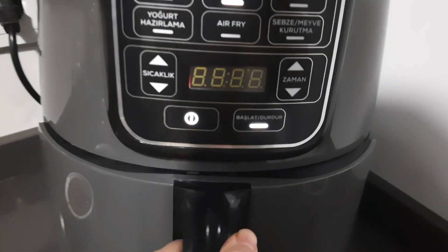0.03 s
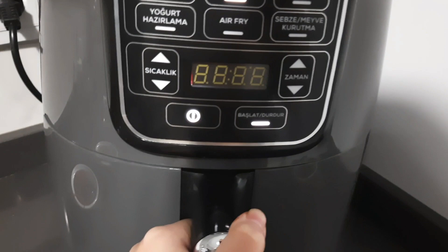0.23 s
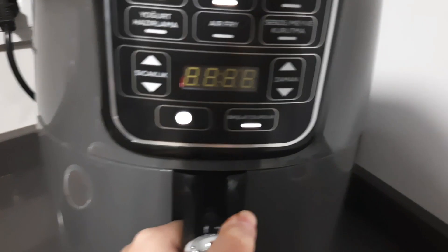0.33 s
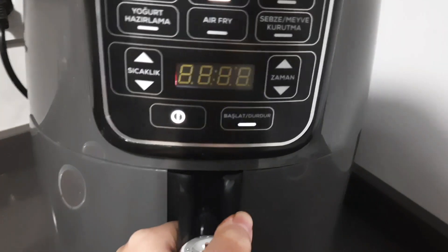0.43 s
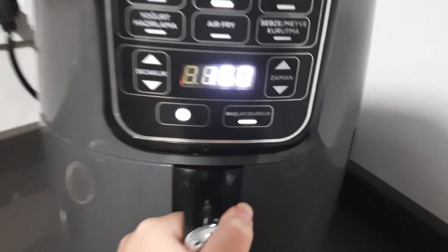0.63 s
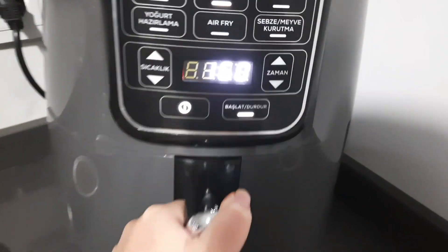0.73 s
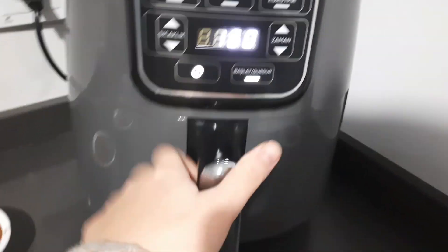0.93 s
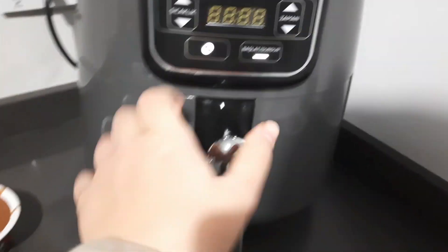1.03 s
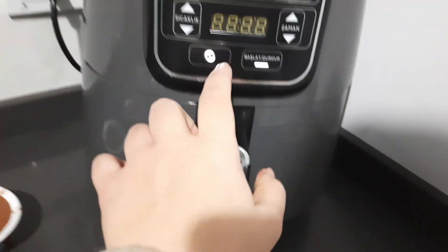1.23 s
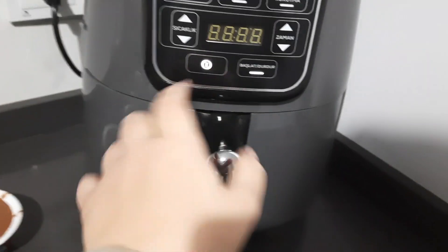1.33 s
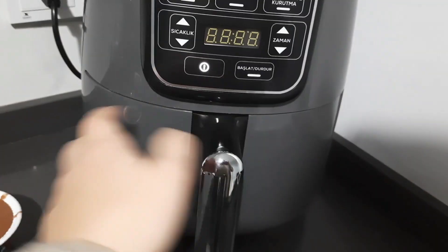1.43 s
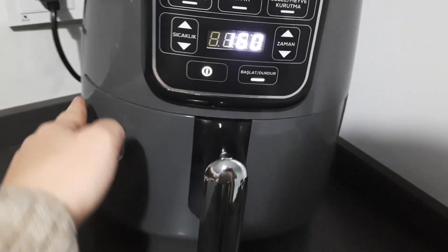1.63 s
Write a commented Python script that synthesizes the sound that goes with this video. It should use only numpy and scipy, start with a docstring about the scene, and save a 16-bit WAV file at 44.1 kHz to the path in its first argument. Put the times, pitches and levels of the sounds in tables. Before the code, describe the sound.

Close by in a small, hard-walled room, an air fryer's drawer scrapes in, bumps the hollow plastic housing and shuts with a sharp snap and a loud clunk. A light metallic rattle follows, leaving a faint electrical hum.

```python
"""A short scrape, a few bumps, a snap and a loud clunk: an air fryer's drawer is pushed shut close by.
The drawer scrapes along its runners, bumps into the hollow housing, snaps past the catch and hits the
end stop. The loose basket rattles briefly, the small hard-walled room rings on,
and a faint mains hum remains."""
import sys
import numpy as np
from scipy import signal
from scipy.fft import rfft, irfft
from scipy.io import wavfile

SR = 44100
rng = np.random.default_rng(int(sys.argv[2]) if len(sys.argv) > 2 else 0)


def digitize_waveform(pressure):
    """Quantize a signal to 16-bit integers and store it at the path in sys.argv[1].

    Rows of a 2-D input are taken as channels; values are limited to [-1, 1].
    """
    field = np.atleast_2d(pressure).T
    bounded = np.clip(field, -1, 1)
    quanta = np.round(bounded * 32767).astype(np.int16)
    wavfile.write(sys.argv[1], SR, quanta)


N = 74970  # 1.7 s


def amp(db):
    """Turns decibels into a factor to multiply a sound by."""
    return 10 ** (np.asarray(db) / 20)


def unit(x):
    """Scales a sound to an average (rms) strength of one."""
    return x / np.sqrt(np.mean(x ** 2) + 1e-20)


def read(points, hz):
    """Looks up a frequency in a table, blending between rows on a scale of octaves."""
    row_hz, value = np.transpose(points)
    return np.interp(np.log(hz + 1), np.log(row_hz + 1), value)


def level(points):
    """Makes a volume curve from rows of (time [s], level [dB])."""
    return amp(np.interp(np.arange(N) / SR, *np.transpose(points)))


def add(mix, start_s, sound):
    """Mixes a sound in at a given time."""
    part = mix[:, round(start_s * SR):][:, :sound.shape[-1]]
    part += sound[..., :part.shape[1]]


def colour(x, db_at):
    """Makes some frequencies stronger than others; db_at gives the relative level of each."""
    size = 4096
    log_gain = np.log(amp(db_at(abs(np.fft.fftfreq(size, 1 / SR)))) + 1e-6)
    response = np.exp(np.conj(signal.hilbert(log_gain)))  # rings after a hit, never before it
    taps = np.fft.ifft(response).real[:size // 2]
    return signal.fftconvolve(x, np.atleast_2d(taps / np.linalg.norm(taps)), axes=1)[:, :x.shape[1]]


def pair(x):
    """Blends two unrelated signals into left and right channels that are alike in the bass."""
    # How alike the two channels are: (frequency [Hz], likeness [0-1])
    likeness = [(100, 0.85), (300, 1), (550, .3), (1200, .25), (3000, 0), (16000, 0.7)]
    left, other = rfft(x)
    same = np.clip(read(likeness, np.fft.rfftfreq(x.shape[1], 1 / SR)), 0, 1)
    right = same * left + np.sqrt(1 - same ** 2) * other
    return irfft(np.array([left, right]), x.shape[1])


def burst(envelope):
    """A burst of stereo noise that follows the shape of a volume curve."""
    noise = pair(rng.choice([-1., 1.], (2, len(envelope))))
    return noise * envelope / np.linalg.norm(envelope)


def ring(tones, t):
    """Adds up dying tones. Here and below, a fade time is how long a sound takes to drop 60 dB."""
    return sum(amp(db - 60 * t / fade_s) * np.sin(2 * np.pi * hz * t) for hz, db, fade_s in tones)


def background(hum_hz=98.8, air_db=-68.5):
    """A wavering mains hum over quiet room noise."""
    # Tone of the room noise: (frequency [Hz], relative level [dB])
    air_tone = [(30, -10.5), (64, -8.5), (140, -2.5), (210, -13.5), (285, 1), (350, -13), (480, -4),
                (700, -13.5), (1000, -27.5), (2300, -26.5), (3500, -30), (6300, -29), (7300, -18.5),
                (8700, -31.5), (16000, -34)]
    # Wavering of the hum: (time [s], level [dB])
    hum_levels = [(0, -58.5), (1.0, -58), (1.22, -63), (1.33, -69), (1.45, -60.5), (1.56, -58), (1.7, -55)]
    air = colour(pair(rng.standard_normal((2, N))), lambda f: read(air_tone, f))
    hum = unit(np.sin(2 * np.pi * hum_hz * np.arange(N) / SR))
    return amp(air_db) * unit(air) + level(hum_levels) * hum


def room(x, delay_s=0.015, build_s=0.0049):
    """Echoes off the hard walls blur into a tail that builds quickly and dies sooner in the treble."""
    # How long the room rings: (frequency [Hz], fade time [s])
    fade_times = [(80, 1.27), (250, 0.7944), (600, 0.7033), (1300, .6), (2500, 0.602), (5500, .5),
                  (8000, 0.5), (12000, 0.52), (16000, 0.08)]
    # Strength of the echoes: (frequency [Hz], relative level [dB])
    echo_tone = [(60, -8), (150, -7), (350, 0.5), (700, 0), (1500, -7), (3000, -9.5), (7000, -12),
                 (10000, -17), (16000, -15)]
    hz, t, bands = signal.stft(pair(rng.standard_normal((2, SR))), SR, nperseg=256)
    fade_s = read(fade_times, hz)[:, None]
    bands *= amp(read(echo_tone, hz)[:, None] - 60 * t / fade_s)
    bands *= np.sqrt(2 * np.log(1000) / (fade_s * SR))  # a longer fade adds no energy
    tail = signal.istft(bands, SR, nperseg=256)[1][:, :SR]
    tail *= np.clip((np.arange(SR) / SR - delay_s) / build_s, 0, 1)
    return signal.fftconvolve(x, tail, axes=1)[:, :N]


def rattles(gain_db=28.5, fade_s=0.09, ring_db=20.5, ring_width_hz=250):
    """The loose basket chatters a few times as it settles, each time with a thin metallic ring."""
    # Rattles of the basket: (time [s], relative level [dB], pitch of the ring [Hz])
    hits = [(.374, -34.5, 5600), (0.422, -41.5, 5000), (0.442, -43.5, 5970), (0.454, -48, 6150),
            (0.47, -50, 6110)]
    # Tone of a rattle under its ring: (frequency [Hz], relative level [dB])
    basket_tone = [(300, -10), (1000, 8), (1700, 18), (2600, 1), (4000, -3), (7500, -11), (9500, -24),
                   (12000, -24), (16000, -32)]
    out, t = np.zeros((2, N)), np.arange(SR // 4) / SR
    for start_s, db, hz in hits:
        noise = burst(amp(-60 * t / fade_s))
        chatter = colour(noise, lambda f: read(basket_tone, f)
                         + ring_db / (1 + ((f - hz) / ring_width_hz) ** 2))
        add(out, start_s, amp(gain_db + db) * chatter)
    return out


def scrape(gain_db=-0.5, slips_per_s=9000, spread_db=2):
    """Many tiny slips of the drawer on its runners merge into a scrape."""
    # Loudness of the scrape during the push: (time [s], relative level [dB])
    push = [(0, -29.5), (.04, -38), (.085, -45), (.16, -50.5), (.19, -37.5), (.215, -28.5), (.245, -22.5),
            (.27, -30.5), (.3, -78.5)]
    # Tone of the scrape: (frequency [Hz], relative level [dB])
    runner_tone = [(40, -20.5), (75, -6), (110, 1.5), (220, -1.5), (330, -9), (460, -7.5), (680, -15.5),
                   (1150, -16), (1800, -17), (3300, -25), (5000, -29), (7700, -32.5), (10000, -52),
                   (16000, -63.5)]
    slips = rng.standard_normal((2, N)) * (rng.random(N) < slips_per_s / SR)
    slips *= amp(spread_db * np.minimum(rng.exponential(1, N), 3))  # a few slips stand out
    rubbing = colour(pair(slips), lambda f: read(runner_tone, f))
    return amp(gain_db) * level(push) * unit(rubbing)


def snaps(gain_db=6.5, crack_fade_s=0.0066, ring_db=-11, ring_fade_s=0.078):
    """Each snap of the catch is a sharp crack with a short bright ring."""
    # Snaps of the catch: (time [s], relative level [dB], left over right [dB])
    hits = [(0.2079, -18, 6.5), (.211, -21.5, 5.5), (0.2604, 0.5, 1), (.2625, -0.5, 1.5), (.268, -20, -1.5)]
    # Tone of a snap: (frequency [Hz], relative level [dB])
    catch_tone = [(200, -20.5), (900, -6), (1600, 4.5), (3200, -2.5), (4500, -0.5), (5500, -1), (7600, 4.5),
                  (9600, -14), (12000, -2.5), (16000, -11.5)]
    # How that tone leans to the left: (frequency [Hz], left over right [dB])
    lean = [(2000, 1.5), (4000, 6), (7000, 9), (9000, -5.5), (15000, -3.5)]
    cracks, t = np.zeros((2, N)), np.arange(SR // 4) / SR
    envelope = amp(-60 * t / crack_fade_s) + amp(ring_db - 60 * t / ring_fade_s)
    for start_s, db, balance_db in hits:
        add(cracks, start_s, amp([[db + balance_db / 2], [db - balance_db / 2]]) * burst(envelope))
    left = colour(cracks[:1], lambda f: read(catch_tone, f) + read(lean, f) / 2)
    right = colour(cracks[1:], lambda f: read(catch_tone, f) - read(lean, f) / 2)
    return amp(gain_db) * np.vstack([left, right])


def knocks(body_db=-4.5, shell_db=17, thump_fade_s=0.034, shell_fade_s=0.055):
    """Each knock thumps the wall it strikes, booms in the housing and clatters the panels."""
    # The drawer knocks, then the housing rocks on its feet and the hand lets go with a faint tap:
    # (time [s], boom [dB], clatter [dB], treble cutoff [Hz], thump [dB], thump pitch [Hz])
    hits = [(0.172, -29, -35, 1410, -29.5, 218), (0.1892, -18.5, -24, 1300, -19, 228),
            (0.2248, -20, -21, 1100, -16, 197), (0.2388, -8.5, -11, 1500, -13, 400.4),
            (0.243, -1.5, -6, 900, -6, 215.5), (0.2618, -10.5, 0, 3800, -6.5, 200.2),
            (0.2905, -2, 1.5, 1300, 3.5, 370), (0.3647, -2.5, -26, 71, -21, 80),
            (.911, -49.5, -46, 751, -48, 410)]
    # Low tones of the hollow housing and the air around it:
    # (pitch [Hz], relative level [dB], fade time [s])
    body_tones = [(80.8, -29, 0.88), (130.4, -16, .45), (150.3, -5, 0.31), (164.53, -24, 1.0),
                  (200.3, -6, 0.22), (239.2, -15, .58), (275.4, -16.5, 0.52), (311.7, -11.5, .47),
                  (330.6, -14.5, 0.22), (371.7, -10.5, 0.32), (442.5, -24.5, 0.67)]
    # Tones of the panels: (pitch [Hz], relative level [dB], fade time [s])
    panel_tones = [(586.5, -34.5, 0.3), (760.7, -37.5, .4), (926, -24.5, 0.038), (1212, -26.5, .12),
                   (1663, -25, 0.13), (1860, -27, 0.17), (2110, -30, 0.11), (2376, -25.5, 0.26),
                   (2999, -25.5, .09)]
    # Dense ringing of the plastic shell: (frequency [Hz], relative level [dB])
    shell_tone = [(40, -35.5), (120, -10), (400, -3), (650, -2.5), (1100, 1), (2000, -4.5), (4000, -10),
                  (8000, -8), (16000, -22)]
    booms, clatters, t = np.zeros((2, N)), np.zeros((2, N)), np.arange(2 * SR) / SR
    body = amp(body_db) * ring(body_tones, t)
    panels = ring(panel_tones, t[:SR])
    contact = 1 - np.exp(-t / 0.00058)  # this and the shell rise in about half a millisecond
    shell_envelope = (1 - np.exp(-t / 0.00049)) * amp(-60 * t / shell_fade_s)
    for start_s, boom_db, clatter_db, cutoff_hz, thump_db, thump_hz in hits:
        soften = signal.butter(2, cutoff_hz, fs=SR)  # soft knocks lose their treble
        thump = ring([(thump_hz, thump_db, thump_fade_s)], t)
        shell = amp(shell_db) * colour(burst(shell_envelope[:SR]), lambda f: read(shell_tone, f))
        add(booms, start_s, signal.lfilter(*soften, contact * thump))
        add(booms, start_s + 0.002, amp(boom_db) * signal.lfilter(*soften, contact * body))
        add(clatters, start_s, amp(clatter_db) * signal.lfilter(*soften, panels + shell))
    return booms, clatters


def scene(left_db=2.62, boom_echo_db=-11.5):
    """The drawer shuts in its room; the boom is close and slightly to the left."""
    booms, clatters = knocks()
    booms = booms * amp([[left_db / 2], [-left_db / 2]])
    drawer = clatters + scrape() + snaps() + rattles()
    echoes = room(drawer + amp(boom_echo_db) * booms)
    return booms + drawer + echoes + background()


def record(dry, low_cut_hz=70, high_cut_hz=16000):
    """The microphone cuts the deep bass and the clunk just overloads it; the top treble is cut too."""
    thinned = signal.sosfilt(signal.butter(4, low_cut_hz, "highpass", fs=SR, output="sos"), dry)
    lowpass = signal.firwin(511, high_cut_hz, window=("kaiser", 9), fs=SR)
    return signal.oaconvolve(np.clip(thinned, -1, 1), lowpass[None], "same")


dry = scene()
out = record(dry)
digitize_waveform(out)
```